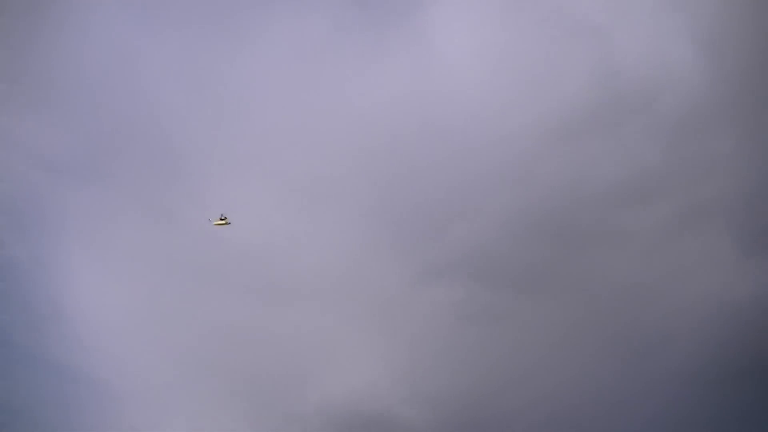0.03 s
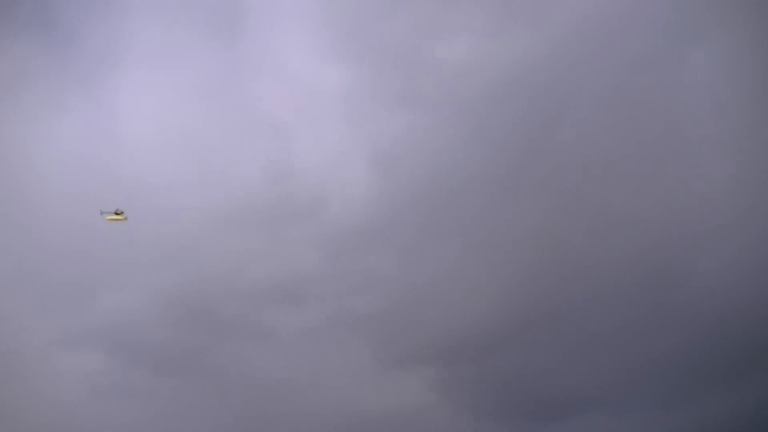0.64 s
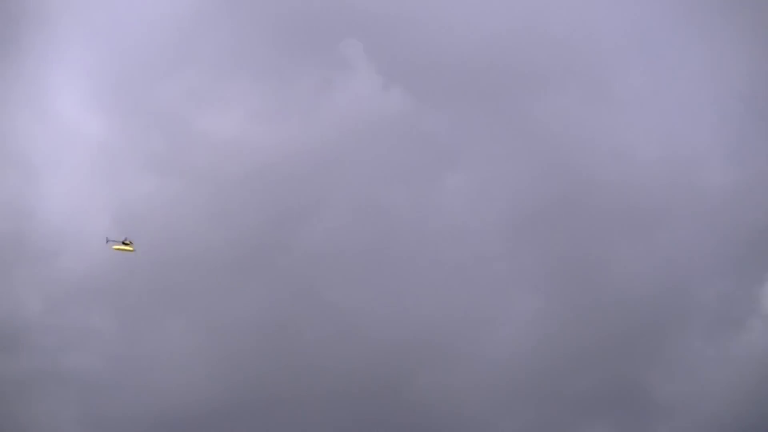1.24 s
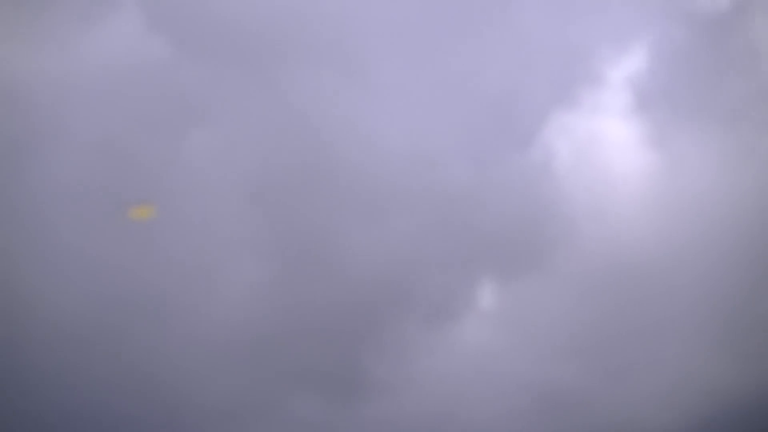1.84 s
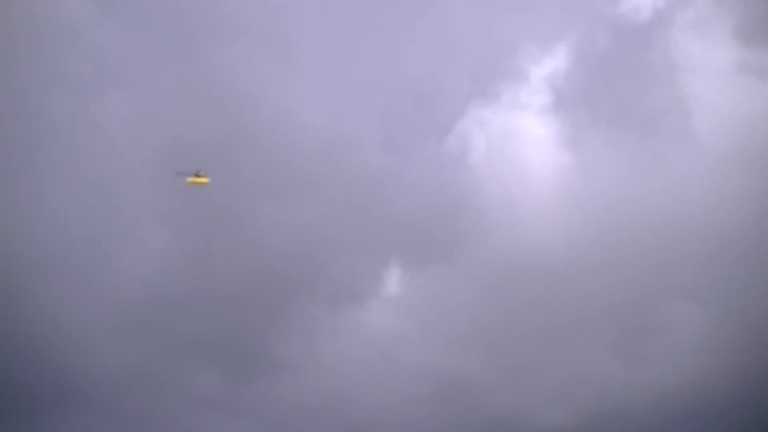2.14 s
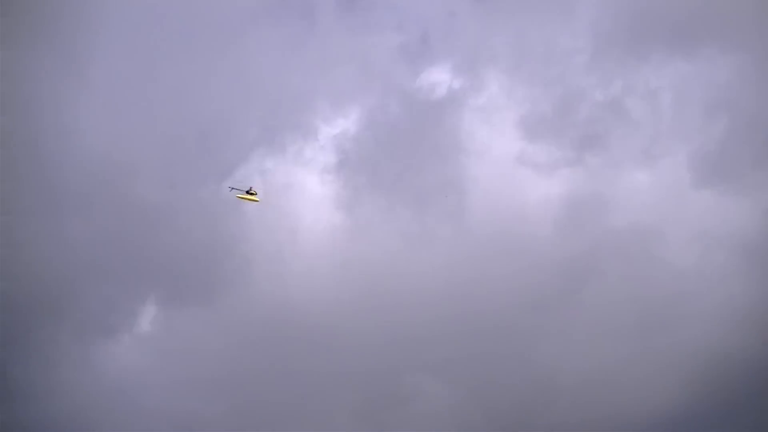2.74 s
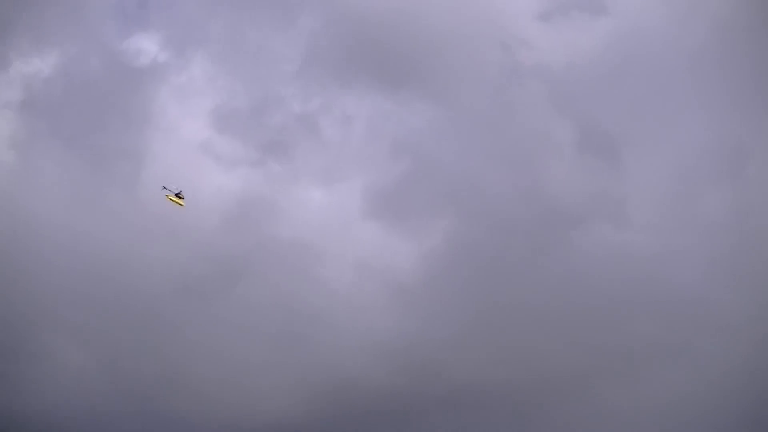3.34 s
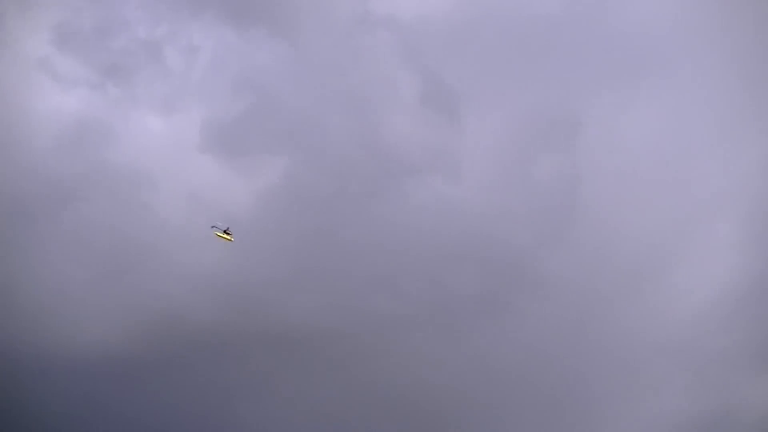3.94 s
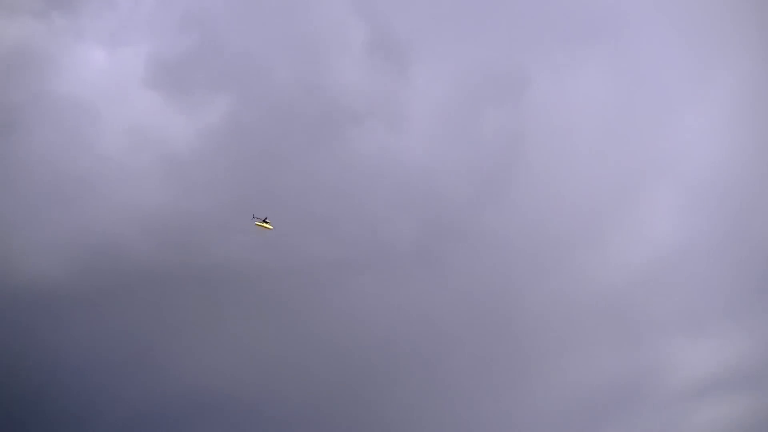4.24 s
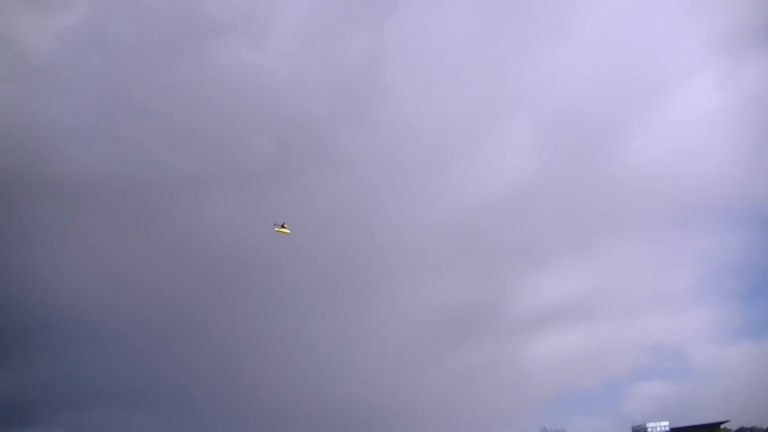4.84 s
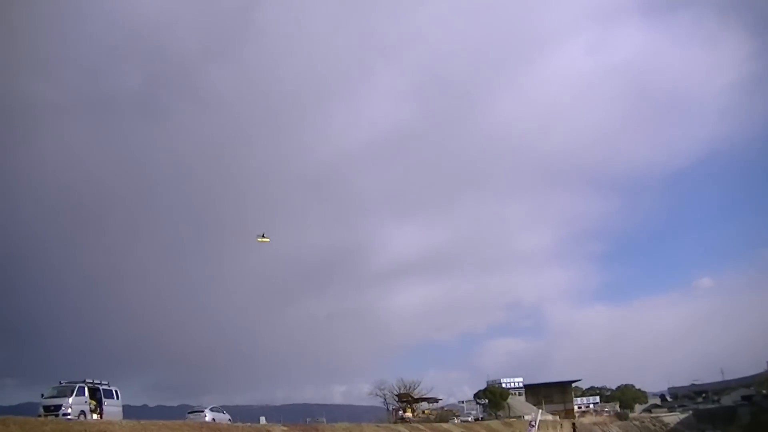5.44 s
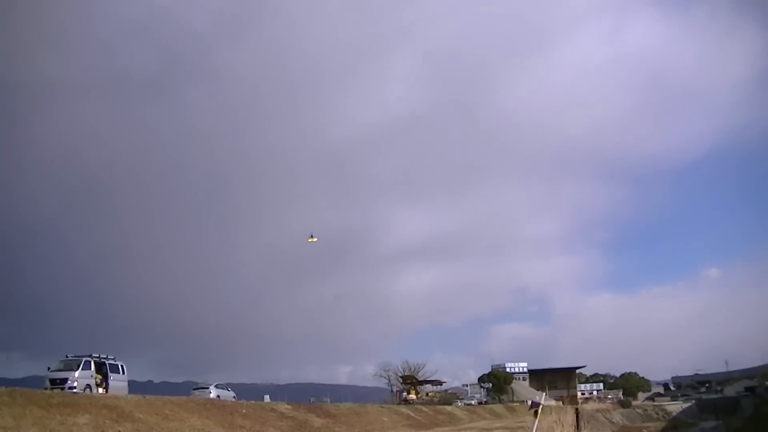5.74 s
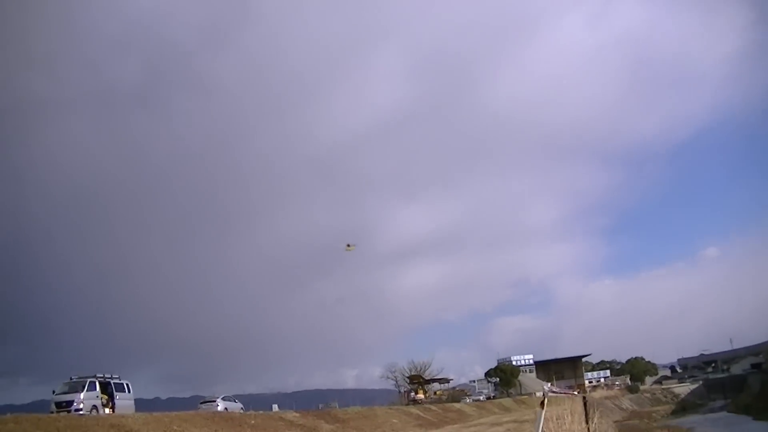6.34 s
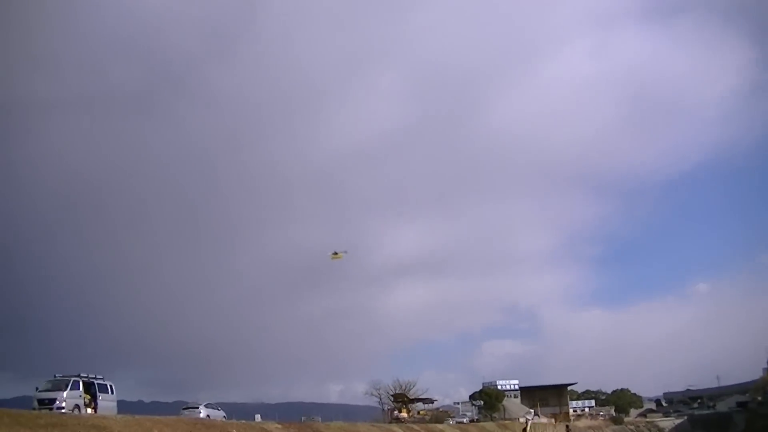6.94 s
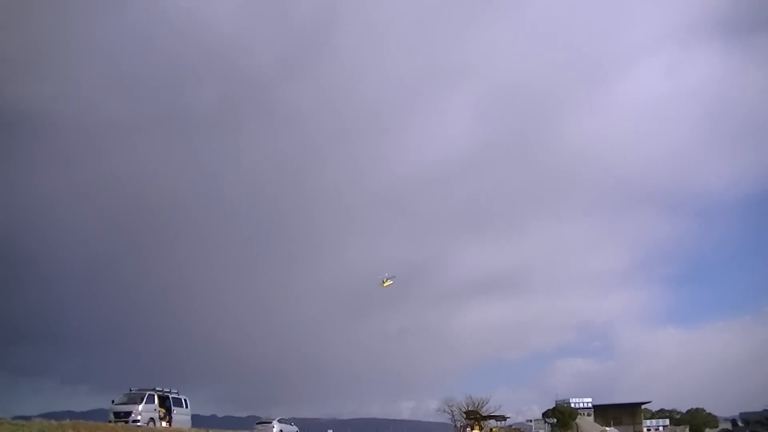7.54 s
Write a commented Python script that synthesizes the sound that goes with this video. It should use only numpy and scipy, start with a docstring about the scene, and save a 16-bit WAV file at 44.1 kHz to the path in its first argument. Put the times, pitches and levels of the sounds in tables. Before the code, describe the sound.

A small radio-controlled helicopter flies past and away, its high electric whine rising and sagging over rotor rush, as wind buffets the microphone.

```python
"""Model helicopter over a windy field

A small electric helicopter swings overhead and away. Its motor surges and coasts about
every 1.3 s, so the gear whine climbs and sags over the rush of the rotor, which the ground
throws back as a sweeping echo. Gusts buffet the microphone, more towards the end."""
import sys
import numpy as np
from scipy import signal
from scipy.fft import rfft, irfft
from scipy.io import wavfile
from scipy.ndimage import uniform_filter1d, map_coordinates

SR = 44100
rng = np.random.default_rng(int(sys.argv[2]) if len(sys.argv) > 2 else 0)


def file_out(sig):
    """Save sig as 16-bit WAV at sys.argv[1]."""
    # one column per channel
    cols = np.atleast_2d(sig).T
    # limit, then scale
    lim = np.clip(cols, -1, 1)
    pcm = np.round(lim * 32767).astype(np.int16)
    wavfile.write(sys.argv[1], SR, pcm)


N = 334719
TIME = np.arange(N) / SR
PINION_TEETH, MAIN_TEETH, TAIL_DRIVE_TEETH, TAIL_TEETH, SPOKES = 13, 150, 106, 26, 8

# wind buffets: time_s, thump_db, dip_db, dip_peak_after_s
BUFFETS = [(2.718, -36, 6.5, 0.017), (2.8, -49, 2.5, 0.02), (2.934, -33.5, 8, 0.0091),
           (3.085, -37, 4.5, 0.0056), (5.35, -35, 5, 0.04), (5.77, -36, 8, 0.02), (5.815, -28, 4, 0.015),
           (5.905, -34.5, 3.5, 0.015), (6.152, -55, 15.5, 0.022), (6.174, -22, 3.5, 0.019),
           (6.243, -32, 9.5, 0.017), (6.288, -32, 4.5, 0.012), (6.385, -32.5, 8, 0.024),
           (6.447, -30, 5, 0.028), (6.51, -29, 9, 0.011), (6.643, -28.5, 6.5, 0.0068),
           (7.063, -48, 5, 0.024), (7.203, -34, 8.5, 0.019), (7.241, -30.5, 8, 0.01),
           (7.312, -33, 6, 0.015), (7.528, -40, 7.5, 0.012)]
# gear hiss envelope: time_s, level_db
HISS_LEVEL = [(0, -52.5), (.33, -43), (.48, -50), (.6, -45), (.72, -48.5), (1.2, -52.5), (1.32, -44.5),
              (1.8, -46.5), (1.98, -40), (2.4, -47), (2.7, -45), (3.05, -52), (3.3, -46.5), (4.45, -47),
              (5.1, -55), (5.6, -46), (5.88, -58.5), (6.36, -54.5), (6.55, -60), (6.78, -54), (7.08, -63.5),
              (7.29, -47), (7.59, -59.5)]
# gear rasp spectrum: freq_hz, density_db
RASP_SPECTRUM = [(500, -68), (3500, -8.5), (4500, -7.5), (5200, -0.5), (5900, -11.5), (6400, 3),
                 (6900, -4.5), (7400, -16), (11000, -45)]


def amp(db):
    """Decibels to gain."""
    return 10 ** (np.asarray(db) / 20)


def unit(x):
    """Scale to rms 1."""
    return x / np.sqrt(np.mean(x ** 2) + 1e-20)


def curves(rows):
    """Each value column, interpolated over time."""
    time_s, *columns = np.transpose(rows)
    return [np.interp(TIME, time_s, column) for column in columns]


def spectrum_gain(points, hz):
    """Gain of a dB spectrum, interpolated over log frequency."""
    points_hz, db = np.transpose(points)
    return amp(np.interp(np.log(hz + 1), np.log(points_hz + 1), db))


def bell(peak_s, half_s):
    """Gaussian swell of height 1."""
    return np.exp(-((TIME - peak_s) / half_s) ** 2)


def low_cut(x, hz, order=3):
    """Butterworth high-pass."""
    return signal.sosfilt(signal.butter(order, hz, "highpass", fs=SR, output="sos"), x + 1e-18)


def drift(rate_hz):
    """Smooth random motion of rms 1, up to about rate_hz."""
    grid_s = TIME[::64]
    hz = np.fft.rfftfreq(len(grid_s), grid_s[1])
    white = rfft(rng.standard_normal(len(grid_s)))
    slow = irfft(white / (1 + (hz / rate_hz) ** 4), len(grid_s))
    return np.interp(TIME, grid_s, unit(slow))


def noise(spectrum, patchy_db, apart=False):
    """Coloured stereo noise of rms 1 with passing patches; apart: independent channels."""
    # stereo width: freq_hz, side_minus_mid_db
    width = [(60, -10), (130, 1), (280, -34), (550, -26), (1000, -21), (2000, -20), (4000, -29.5),
             (8000, -42), (13000, -72)]
    frames, hz = N // 256 + 5, np.fft.rfftfreq(1024, 1 / SR)
    mid_re, mid_im, side_re, side_im, patches = rng.standard_normal((5, frames, len(hz)))
    patches = uniform_filter1d(patches, size=8, axis=0)
    patches = unit(uniform_filter1d(patches, size=10, axis=1))
    mid = mid_re + 1j * mid_im
    side = (side_re + 1j * side_im) * (1 if apart else spectrum_gain(width, hz))
    bins = np.array([mid + side, mid - side]) * spectrum_gain(spectrum, hz) * amp(patchy_db * patches)
    _, stereo = signal.istft(bins, nperseg=1024, noverlap=768, time_axis=1, freq_axis=2)
    return unit(stereo[:, :N])


def tone(turns, fade_db=3.5, jitter_rad=0.14, fade_hz=6.1):
    """One line, its level and phase shaken by turbulent air."""
    gain = np.sqrt(2) * amp(fade_db * drift(fade_hz))
    return gain * np.cos(2 * np.pi * (turns + rng.random()) + jitter_rad * drift(60))


def lines(table, step, centre=0, fade_db=4.0, jitter_rad=0.35, fade_hz=6.2):
    """Tones at whole multiples of step around centre, both in turns."""
    return sum(amp(db) * tone(centre + round(k) * step, fade_db, jitter_rad, fade_hz) for k, db in table)


def swells(table):
    """Short swells of band noise, bass removed."""
    out, hz = np.zeros(N), np.fft.rfftfreq(SR, 1 / SR)
    for start_s, length_s, centre_hz, width_hz, db in table:
        count = int(length_s * SR)
        band = 1 / (1 + (2 * (hz - centre_hz) / width_hz) ** 4)
        burst = irfft(rfft(rng.standard_normal(SR)) * band)[:count]
        out[int(start_s * SR):][:count] += amp(db) * unit(burst) * np.hanning(count)
    return low_cut(out, hz=250, order=4)


def wind():
    """Lumpy turbulence, different at each microphone port: breeze, gusts, a thump per buffet."""
    # gusts: peak_s, half_length_s, level_db
    gusts = [(.8, 0.11, -57), (1.42, 0.045, -48), (2.113, 0.057, -55), (2.782, 0.06, -43),
             (3.003, 0.23, -39), (3.423, 0.17, -49.5), (5.297, 0.19, -42.5), (5.433, 0.018, -40),
             (5.832, 0.089, -39), (6.197, 0.29, -49.5), (6.576, 0.35, -37), (7.057, 0.076, -39),
             (7.246, 0.084, -51), (7.484, 0.12, -36.5)]
    # turbulence spectrum: freq_hz, density_db
    rumble = [(25, -62), (50, -56), (80, -50), (130, -22), (200, -2.5), (300, 4), (500, 2), (800, -2),
              (1500, -19), (3000, -32), (8000, -71)]
    breeze_db, thump_lead_s, thump_half_s = -68.5, 0.001, 0.021
    flow = amp(breeze_db) + sum(amp(db) * bell(peak_s, half_s) for peak_s, half_s, db in gusts)
    thumps = sum(amp(db) * bell(time_s - thump_lead_s, thump_half_s) for time_s, db, _, _ in BUFFETS)
    lumps_db = 2.3 * np.array([drift(45), drift(45)])
    return noise(rumble, patchy_db=-0.5, apart=True) * np.hypot(flow * amp(lumps_db), thumps)


def knocks():
    """Hard buffets push the diaphragm, mostly at one port, with a snap where it overloads."""
    # diaphragm hits: time_s, pitch_hz, half_length_s, push_db, snap_db, left_minus_right_db
    hits = [(6.155, 330, .002, -30, -30, -8), (6.1733, 700, .0012, -3, -10, -9),
            (6.2405, 350, .0025, -27, -30, -10), (6.442, 480, .002, -24, -42, -9),
            (6.644, 420, .0025, -27, -45, 10), (6.666, 400, .002, -29, -50, -6),
            (7.063, 400, .0016, -28, -45, -10), (7.204, 460, .002, -23, -40, -12),
            (7.244, 450, .002, -25, -45, 10)]
    snap_decay_s = .0001
    out = np.zeros((2, N))
    for time_s, hz, half_s, push_db, snap_db, pan_db in hits:
        age_s = TIME - time_s
        push = amp(push_db) * bell(time_s, half_s) * np.sin(2 * np.pi * hz * age_s)
        snap = amp(snap_db) * (age_s >= 0) * np.exp(-abs(age_s) / snap_decay_s)
        out += (low_cut(push, hz=190) + low_cut(snap, hz=500)) * amp([[pan_db / 2], [-pan_db / 2]])
    return out


def ticks():
    """Brief ticks, pings and scuffs."""
    # noise bursts: start_s, length_s, centre_hz, width_hz, level_db
    bursts = [(.268, .03, 11500, 5000, -42), (.39, .006, 9500, 7000, -32), (.853, .022, 2200, 2200, -29.5),
              (5.02, .05, 1860, 90, -33.5), (5.022, .05, 4470, 90, -42), (2.92, .012, 1800, 2400, -35),
              (5.69, .1, 1900, 1100, -33)]
    return swells(bursts)


def whooshes():
    """The blades bite harder for a moment."""
    # blade bites: start_s, length_s, centre_hz, width_hz, level_db
    bites = [(.52, .22, 790, 260, -34), (.66, .06, 400, 200, -41), (3.228, .045, 950, 330, -28.5),
             (4.72, .4, 1050, 500, -33), (5.295, .05, 550, 350, -35), (5.43, .05, 750, 750, -29.5),
             (5.68, .1, 1000, 900, -32)]
    return swells(bites)


def ground_echo(x, share=.25):
    """One reflection; its comb rises as the helicopter sinks towards the horizon."""
    # echo delay: time_s, lag_s
    delay = [(0, 0.0051), (1.3, 0.0064), (3, 0.0071), (3.8, 0.0067), (5, 0.00326), (6, .0021), (7.6, .002)]
    lag_s, = curves(delay)
    echo = np.array([np.interp(TIME - lag_s, TIME, channel, left=0) for channel in x])
    return (x + share * echo) / np.hypot(1, share)


def rotor_air(rotor_turns, unrest):
    """Wash and tip swish of air torn by two blades, pulsing twice a turn."""
    # air envelopes: time_s, wash_db, swish_db
    levels = [(0, -34.5, -40), (.65, -32.5, -38), (.85, -32.5, -39.5), (1.3, -33, -38), (1.55, -33, -37.5),
              (1.92, -32, -32.5), (2.35, -31.5, -39), (2.68, -33, -38), (3.05, -36.5, -46.5),
              (3.3, -32.5, -39), (3.9, -33, -40), (4.97, -31, -39.5), (5.1, -32, -41.5),
              (5.38, -32.5, -45.5), (5.47, -31, -40.5), (5.74, -33.5, -42), (5.85, -35.5, -46.5),
              (6.0, -30.5, -42), (6.52, -35.5, -51), (6.56, -36.5, -50), (6.82, -36, -49.5),
              (6.96, -32, -48), (7.59, -35, -43)]
    # rotor wash spectrum: freq_hz, density_db
    wash_spectrum = [(25, -63), (60, -62), (100, -38), (160, -37.5), (250, -17.5), (350, -14.5),
                     (460, -6.5), (580, -3), (850, 2), (1150, -1), (1550, -3), (2100, -11.5), (3200, -41.5),
                     (6000, -59), (12000, -80)]
    # blade tip spectrum: freq_hz, density_db
    swish_spectrum = [(100, -70), (900, -48), (1500, 0.5), (2100, 1), (3000, 0), (3700, -6), (4600, -8),
                      (7000, -12), (14000, -35)]
    wash_db, swish_db = curves(levels)
    blades = np.cos(4 * np.pi * rotor_turns)
    wash = noise(wash_spectrum, patchy_db=0.2) * amp(wash_db + 0.13 * unrest)
    swish = noise(swish_spectrum, patchy_db=1.0) * amp(swish_db + 0.48 * unrest)
    return wash * (1 + 0.13 * blades) + swish * (1 + 0.064 * blades)


def tooth_errors(rotor_turns, points_per_turn=1024, memory_per_turn=.85):
    """Tooth unevenness repeats each turn and slowly changes: a fine comb gliding with the rotor."""
    fresh = rng.standard_normal((int(rotor_turns[-1]) + 2, points_per_turn))
    pattern = signal.lfilter([1], [1, -memory_per_turn], fresh, axis=0).ravel()
    scrape = map_coordinates(pattern, [rotor_turns * points_per_turn], order=3)
    colour = spectrum_gain(RASP_SPECTRUM, np.fft.rfftfreq(N, 1 / SR))
    return unit(irfft(rfft(scrape) * colour, N))


def gear_rasp(rotor_turns, unrest, tooth_share=.6):
    """Gear noise, part random, part coming round with the teeth."""
    # rasp envelope: time_s, level_db
    level = [(0, -43.5), (.6, -40.5), (1.05, -41.5), (1.5, -40.5), (2.0, -37), (2.5, -40), (2.7, -38.5),
             (3.05, -45), (3.3, -40), (4.3, -39.5), (4.8, -42.5), (4.92, -50), (5.35, -47), (5.62, -41.5),
             (5.98, -56), (6.5, -56), (6.75, -47.5), (7.05, -54.5), (7.38, -42), (7.59, -58)]
    loose = np.sqrt(1 - tooth_share) * noise(RASP_SPECTRUM, patchy_db=4.0)
    repeating = np.sqrt(tooth_share) * tooth_errors(rotor_turns)
    return (loose + repeating) * amp(curves(level)[0] + 1.8 * unrest)


def gear_hiss(rotor_turns, unrest):
    """Treble noise of the gears, pulsing once a rotor turn."""
    # hiss spectrum: freq_hz, density_db
    spectrum = [(300, -48), (4000, -4.5), (7000, 5), (8300, 1), (9200, 3), (10300, -2), (11300, 0),
                (12100, -2.5), (12800, 3), (13600, -7), (15500, -19)]
    hiss = noise(spectrum, patchy_db=2.0) * amp(curves(HISS_LEVEL)[0] + 1.74 * unrest)
    return hiss * (1 + 0.067 * np.cos(2 * np.pi * rotor_turns))


def hum(motor_turns, rotor_turns):
    """Low motor and tail rotor lines; the tail's fundamental carries while it faces the microphone."""
    # motor lines: motor_multiple, level_db
    motor_lines = [(3, 0), (4, -5.5), (5, -10), (6, -.5)]
    # tail rotor overtones: blade_rate_multiple, level_db
    tail_lines = [(3, -11), (5, -6), (6, -7), (8, -11), (9, -14)]
    # envelope of both: time_s, level_db
    level = [(0, -50.5), (1.7, -46.5), (2.0, -39), (2.7, -41), (2.95, -48.5), (3.3, -48), (4.2, -52),
             (5.2, -53), (6.4, -60), (7.59, -56.5)]
    # tail fundamental envelope: time_s, level_db
    drone_level = [(0, -54), (.65, -51), (.85, -63), (7.6, -73)]
    tail_passes = 2 * TAIL_DRIVE_TEETH * rotor_turns / TAIL_TEETH
    overtones = lines(motor_lines, motor_turns, fade_db=1.5, jitter_rad=0.37)
    overtones += amp(-4.0) * lines(tail_lines, tail_passes)
    return amp(curves(level)[0]) * overtones + amp(curves(drone_level)[0]) * tone(tail_passes)


def tail_gear(rotor_turns, flutter_db=3.5, lead_turns=.38):
    """Tail mesh tone: flutters every rotor turn, at times chatters every second one."""
    # tail gear envelopes: time_s, level_db, chatter_db
    levels = [(0, -51.5, 8), (.42, -48.5, 9), (.54, -42.5, 12), (.8, -45, 8), (.92, -49, 4), (1.15, -51, 2),
              (1.8, -44, -1), (2.6, -55, 0), (3.1, -64, -4), (4.0, -66, 0), (4.4, -53, -2), (5.3, -64, -4),
              (5.72, -55, 4), (6.25, -65, 3), (6.55, -56, -1), (6.85, -58, -1), (7.0, -54, 4),
              (7.09, -60, 4), (7.12, -46, 7), (7.2, -50, 6), (7.3, -58, 3), (7.59, -56, 2)]
    level_db, chatter_db = curves(levels)
    mesh = TAIL_DRIVE_TEETH * rotor_turns
    half_angle = np.pi * (rotor_turns + lead_turns)
    swing_db = chatter_db * np.minimum(np.cos(half_angle) - 0.6, 0) + flutter_db * np.cos(2 * half_angle)
    mesh_tone = tone(mesh, fade_db=1.0, jitter_rad=0.4) * (1 + 0.35 * drift(120))
    sideband = amp(-8.0) * tone(mesh - mesh / TAIL_TEETH)
    return amp(level_db + swing_db) * (mesh_tone + sideband)


def sizzle(motor_turns, spoke_passes):
    """High lines below and around twice the mesh rate, following the level of the hiss."""
    # high lines: motor_multiple, spoke_rate_offset, level_db
    partials = [(22, 0, -14), (23, -1, -13), (24, -2, -16), (23, 0, -11), (24, -1, -12), (24, 0, -7),
                (25, -1, -11.5), (26, -2, -13), (25, 0, -14.5), (26, -1, -2), (26, 0, -9), (27, -1, -17),
                (26, 1, -17)]
    hiss_db, = curves(HISS_LEVEL)
    level_db = -60 + 1.35 * (hiss_db - np.mean(hiss_db))
    return amp(level_db) * sum(
        amp(db) * tone(round(k) * motor_turns + round(j) * spoke_passes, fade_db=2.8, jitter_rad=.4)
        for k, j, db in partials)


def motor_whine(motor_turns, spoke_passes):
    """Motor harmonics; the off-centre pinion repeats the lower spoke sideband one motor rate down."""
    # whine lines: motor_multiple, level_db
    partials = [(10, -14), (11, -4.5), (12, -6), (14, -17.5), (15, -20), (16, -18)]
    # whine envelope, loudest overhead: time_s, level_db
    level = [(0, -70), (.6, -50), (1.25, -49.5), (1.7, -31), (2.0, -32.5), (2.34, -32.5), (2.48, -38.5),
             (2.68, -36), (2.76, -48), (3.05, -46), (3.28, -37.5), (3.8, -39), (4.25, -54), (4.7, -54),
             (5.0, -65), (5.55, -60), (5.9, -72), (7.1, -69), (7.59, -56)]
    shake = dict(jitter_rad=.5, fade_hz=22)
    whine = lines(partials, motor_turns, fade_db=1.8, **shake)
    whine += amp(-8.5) * tone((PINION_TEETH - 1) * motor_turns - spoke_passes, fade_db=2.0, **shake)
    return amp(curves(level)[0]) * whine


def main_gear(motor_turns, spoke_passes):
    """Mesh tone, with sidebands from the gear's stiffness at each spoke and the pinion's run-out."""
    # mesh tone envelope: time_s, level_db
    mesh_level = [(0, -45.5), (.52, -38.5), (.61, -38), (.68, -45), (.86, -43), (.93, -37), (.97, -50),
                  (1.44, -43.5), (1.85, -33.5), (1.98, -28.5), (2.22, -28), (2.36, -30.5), (3.0, -33),
                  (3.3, -32.5), (4.29, -39.5), (4.49, -50), (4.68, -35.5), (5.1, -45.5), (5.48, -37),
                  (5.6, -36), (5.73, -36), (5.82, -51), (5.89, -39.5), (5.98, -37), (6.02, -48),
                  (6.14, -50), (6.21, -65), (6.36, -43), (6.47, -52.5), (6.77, -34.5), (7.03, -57),
                  (7.3, -48), (7.59, -50)]
    # sideband envelope: time_s, level_db
    sideband_level = [(0, -48), (.45, -39), (.92, -42), (.98, -54), (1.45, -44.5), (1.85, -34), (2.02, -31),
                      (2.4, -40), (2.8, -42), (3.15, -40.5), (4.29, -46.5), (4.6, -46.5), (5.4, -42.5),
                      (5.58, -33.5), (5.83, -51), (5.94, -46), (6.12, -60), (6.33, -47), (6.6, -60),
                      (6.75, -52), (6.9, -49), (6.98, -42.5), (7.08, -54), (7.59, -51)]
    # spoke sidebands: spoke_rate_offset, level_db
    spoke_lines = [(-2, -14.5), (-1, -1), (1, -10), (2, -23)]
    # run-out sidebands: motor_rate_offset, level_db
    run_out_lines = [(-1, -13), (1, -15.5)]
    mesh = PINION_TEETH * motor_turns
    mesh_tone = amp(curves(mesh_level)[0]) * tone(mesh, fade_db=1.0, jitter_rad=0.27)
    sidebands = lines(spoke_lines, spoke_passes, mesh, fade_db=2.0, jitter_rad=0.18, fade_hz=20)
    sidebands += lines(run_out_lines, motor_turns, mesh)
    return mesh_tone + amp(curves(sideband_level)[0]) * sidebands


def frame_ring(x):
    """Lines swell as they glide through the frame's resonances."""
    # frame modes: centre_hz, width_hz, boost_db
    modes = [(5570, 110, 3), (5810, 130, 2.5), (11250, 220, 6), (12720, 260, 3.5)]
    hz = np.fft.rfftfreq(N, 1 / SR)
    boost_db = sum(db / (1 + (2 * (hz - centre_hz) / width_hz) ** 2) for centre_hz, width_hz, db in modes)
    return irfft(rfft(x) * amp(boost_db), N)


def whine_fading():
    """The whine briefly drops out and flares, and flutters more at a distance."""
    # dropouts and flares: peak_s, half_length_s, gain_db
    fades = [(.605, .02, 4), (1.81, .015, -5), (2.371, .018, -8), (2.605, .02, -10), (2.995, .02, 5),
             (3.37, .018, -6), (3.475, .018, -8), (3.57, .015, -6), (3.65, .025, -11), (3.801, .012, -7),
             (3.939, .012, -7), (4.045, .022, -9), (4.092, .018, 8), (4.127, .012, -12), (4.196, .01, -7),
             (4.268, .01, -8), (4.349, .015, -8), (4.875, .028, -9), (4.94, .02, 4), (5.092, .018, -8),
             (5.174, .014, -9), (5.49, .015, -4), (5.553, .012, -7), (6.655, .015, -5), (6.78, .018, 4),
             (6.845, .02, -7)]
    far = np.interp(TIME, [2.4, 3.4], [.45, 1])
    shake_db = 2.5 * far * drift(26)
    fades_db = sum(db * bell(peak_s, half_s) for peak_s, half_s, db in fades)
    return unit(amp(shake_db + fades_db))


def motor_speed_hz(start_hz=492.0, rest_hz=481.8, spin_up_s=.252, coast_s=.334):
    """The heavy rotor makes the speed climb exponentially in each surge and sag after it."""
    # motor surges: on_s, off_s, drive_target_hz, coast_target_hz
    surges = [(0.365, 1.023, 508.1, 489.0), (1.6, 2.223, 506.9, 477.8), (2.888, 3.544, 509.8, 483.0),
              (4.195, 4.81, 503.5, 477.8), (5.427, 6.107, 509.4, 477.6), (6.714, 7.398, 505.7, 489.6)]
    speed_hz = rest_hz + (start_hz - rest_hz) * np.exp(-TIME / coast_s)
    for on_s, off_s, top_hz, low_hz in surges:
        for from_s, aim_hz, lag_s in (on_s, top_hz, spin_up_s), (off_s, low_hz, coast_s):
            i = int(from_s * SR)
            speed_hz[i:] = aim_hz + (speed_hz[i] - aim_hz) * np.exp(-(TIME[i:] - from_s) / lag_s)
    return speed_hz


def drive_train(motor_turns, rotor_turns, gear_fray_db=1.0, whine_fray_db=2.2, fray_hz=55):
    """Motor, gears and tail rotor, locked together by their tooth counts."""
    spoke_passes = SPOKES * rotor_turns
    gear = main_gear(motor_turns, spoke_passes)
    whine = motor_whine(motor_turns, spoke_passes)
    high_lines = sizzle(motor_turns, spoke_passes)
    # the lines fray as the teeth chatter in their play
    gear *= unit(amp(gear_fray_db * drift(fray_hz)))
    whine *= unit(amp(whine_fray_db * drift(fray_hz)))
    # the main gear wobbles once a turn; its teeth never meet quite alike
    wobble = 1 + 0.018 * np.cos(2 * np.pi * rotor_turns) + 0.057 * drift(230)
    singing = frame_ring(gear + whine + high_lines) * wobble
    return singing + hum(motor_turns, rotor_turns) + tail_gear(rotor_turns)


def scene():
    """The helicopter almost straight ahead, and wind at the microphone."""
    # helicopter balance: time_s, left_minus_right_db
    balance = [(0, .8), (1.8, .9), (3.2, .2), (7.6, .1)]
    pan_db, = curves(balance)
    motor_turns = np.cumsum(motor_speed_hz() * (1 + .0004 * drift(12))) / SR
    rotor_turns = motor_turns * PINION_TEETH / MAIN_TEETH
    tones = drive_train(motor_turns, rotor_turns) * whine_fading()
    lead = 0.0032 * np.gradient(tones)  # reaches the left port a sliver of a sample early
    unrest = drift(10.3)  # level wander shared by air, rasp and hiss
    rush = ground_echo(rotor_air(rotor_turns, unrest))
    gear_noise = gear_rasp(rotor_turns, unrest) + gear_hiss(rotor_turns, unrest)
    helicopter = np.array([tones + lead, tones - lead]) + rush + gear_noise
    helicopter *= amp([pan_db / 2, -pan_db / 2])
    buffeting = (wind() + knocks()) * amp([[-.7], [.7]])  # the right port catches more
    return helicopter + buffeting + ticks() + whooshes()


def record(dry, cutoff_hz=15600):
    """The level dips briefly after each buffet; then a low-pass."""
    dip_db = np.zeros(N)
    for time_s, _, depth_db, peak_after_s in BUFFETS:
        age = np.maximum(TIME - time_s, 0) / peak_after_s
        dip_db += depth_db * (age * np.exp(1 - np.minimum(age, 20))) ** 2
    low_pass = signal.firwin(511, cutoff_hz, window=("kaiser", 9), fs=SR)
    return signal.oaconvolve(dry * amp(-dip_db), low_pass[None], "same")


dry = scene()
out = record(dry)
file_out(out)
```